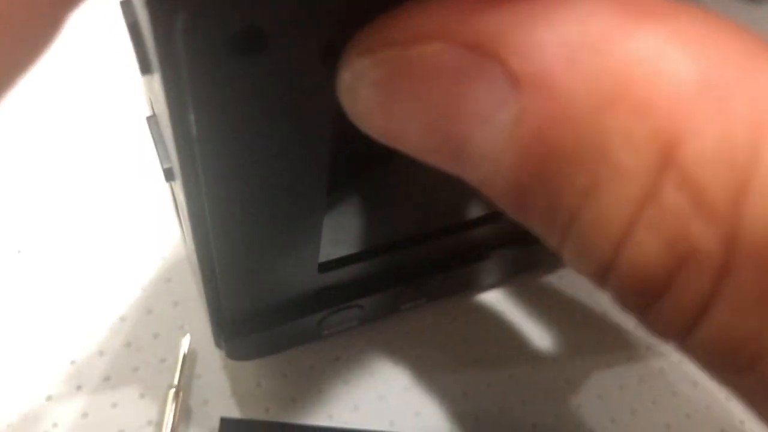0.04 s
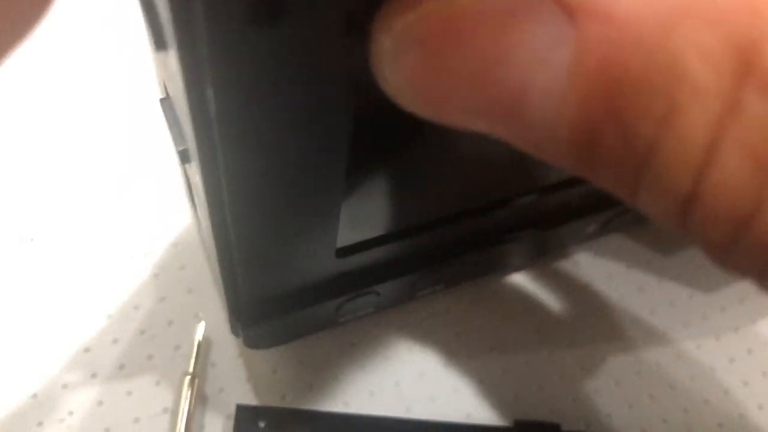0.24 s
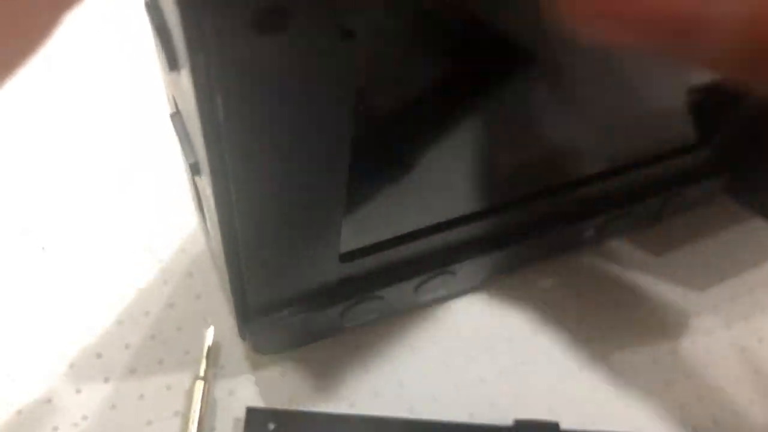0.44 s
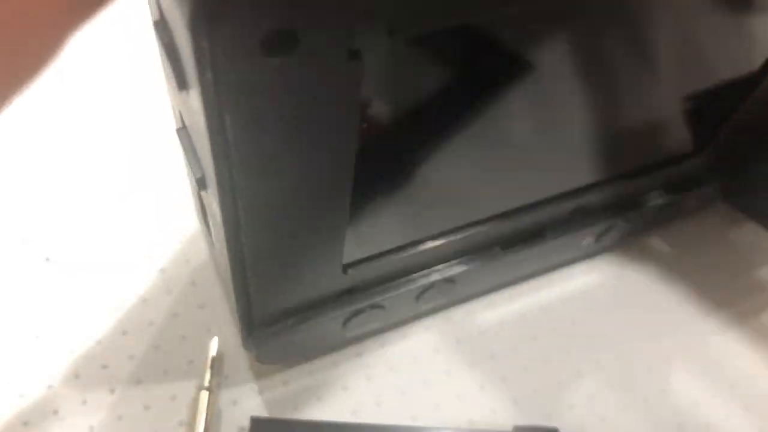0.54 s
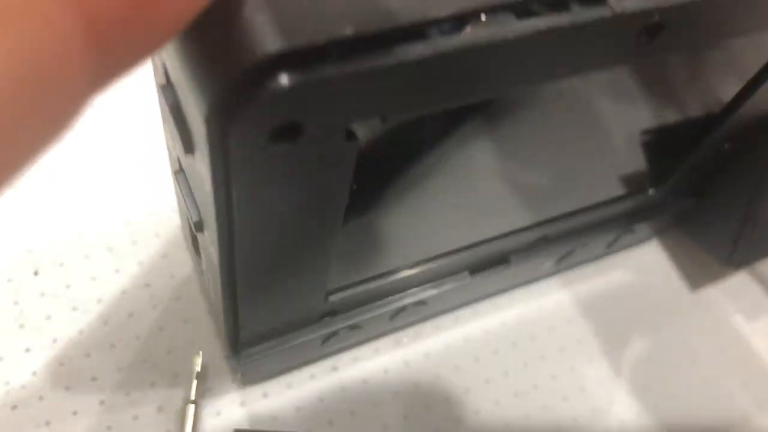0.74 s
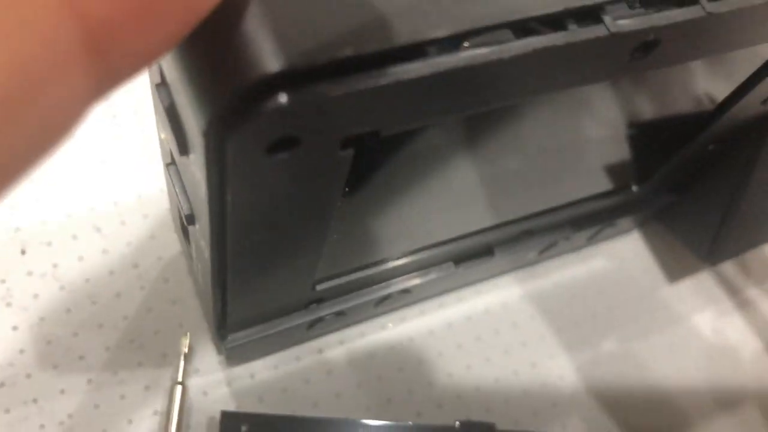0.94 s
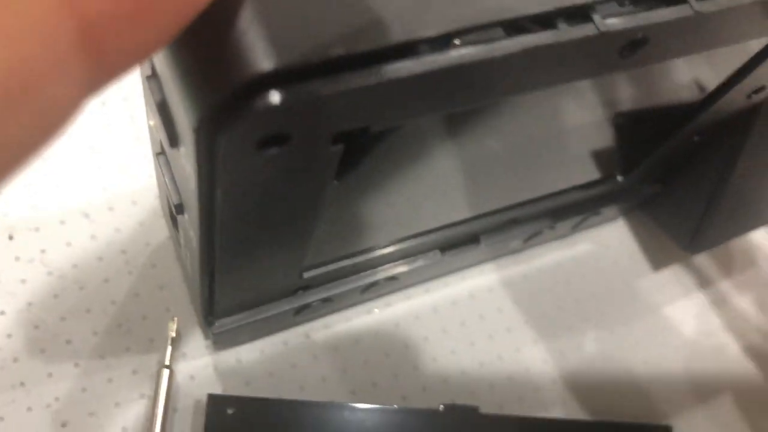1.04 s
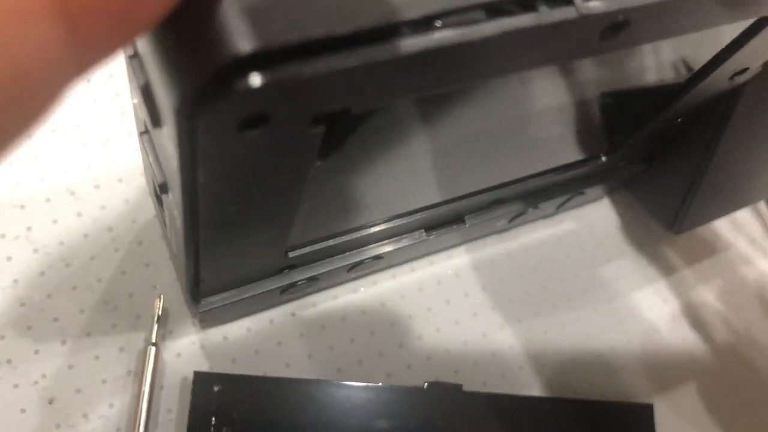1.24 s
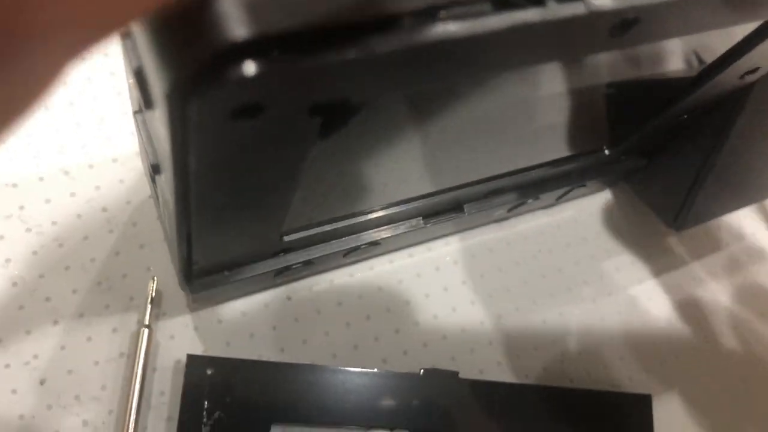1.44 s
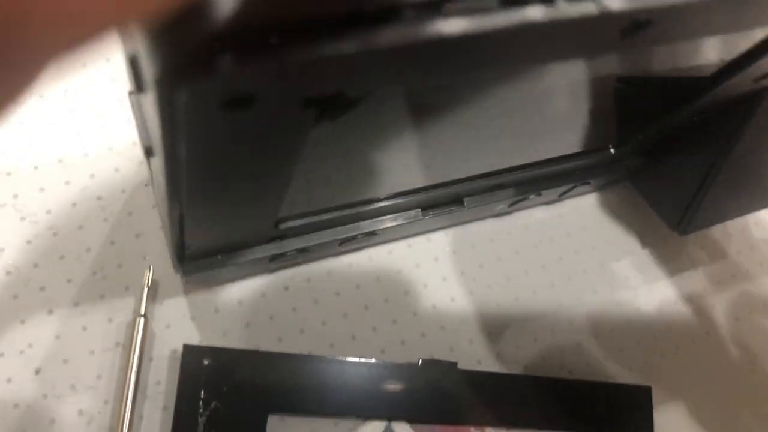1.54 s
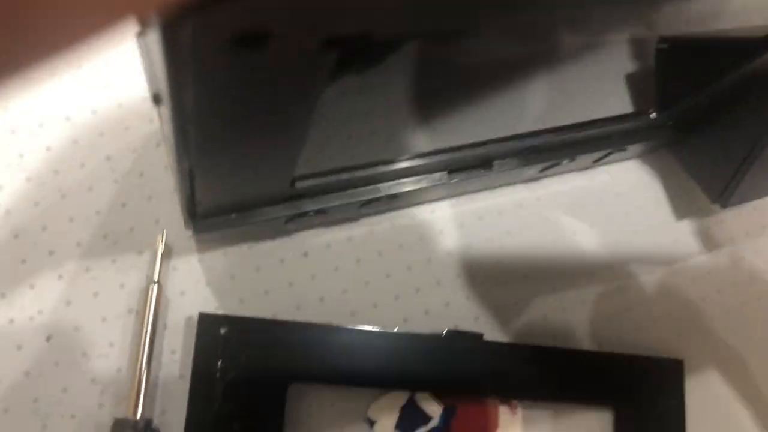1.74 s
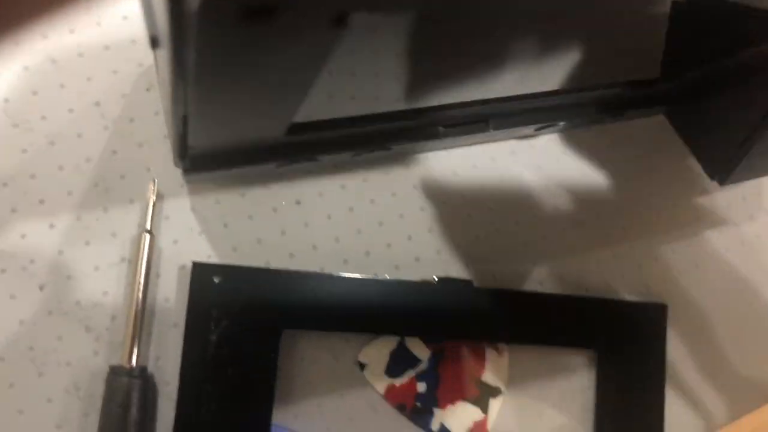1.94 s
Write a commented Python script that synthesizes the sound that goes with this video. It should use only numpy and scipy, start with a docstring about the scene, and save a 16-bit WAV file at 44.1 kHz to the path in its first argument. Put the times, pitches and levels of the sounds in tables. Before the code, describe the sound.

Sharp plastic snaps of a small casing pried by hand, two loud ones in the first half second, then a gritty rub, near quiet, and a softer click with a knock near the end; close microphone, quiet room.

```python
"""Snaps and ticks of a small plastic casing, pried and shifted by hand on a table close to the microphone.
Each snap is a blow and a short chatter of noise that rings the casing's modes. Knocks are dying
low modes of the table top. Fingers and edges slide over it as gritty, shaped noise.
Things on the table scatter the snaps and knocks, a room answers them, and its quiet hum lies behind."""
import sys
import numpy as np
from scipy import signal
from scipy.fft import rfft, irfft, next_fast_len
from scipy.io import wavfile
from scipy.ndimage import uniform_filter1d, map_coordinates

SR = 44100
rng = np.random.default_rng(int(sys.argv[2]) if len(sys.argv) > 2 else 0)


def transcribe(signal):
    """Save signal, clipped to [-1, 1], as a 16-bit WAV file at the path in sys.argv[1]."""
    frames = np.atleast_2d(signal).T
    limited = np.clip(frames, -1, 1)
    pcm = np.round(limited * 32767).astype(np.int16)
    wavfile.write(sys.argv[1], SR, pcm)


def elevation(decibels):
    """Turn decibel levels (scalar or array-like) into linear amplitude ratios."""
    levels = np.asarray(decibels, float)
    return 10 ** (levels / 20)


N = 88200  # samples, two seconds

# Snaps and ticks of the casing. Each row: start in seconds, level in dB of the direct sound,
# strongest frequency in Hz, spread in octaves, contact length in seconds.
CLICK_EVENTS = [(.0937, -62.5, 3860, 1.1, 0.0015), (0.1567, -43.5, 3360, 1.6, 0.00067),
                (0.216, -57.5, 8900, 1.8, 0.00055), (.228, -70, 12000, 0.53, 0.0015),
                (.2355, -65, 4120, 1, 0.0015), (0.2499, -28, 6600, 1.34, 0.001),
                (0.3833, -43, 2200, 1.1, 0.003), (.4325, -36.5, 4140, 1.5, 0.0073),
                (0.4367, -24, 7000, 1.6, 0.00061), (0.4378, -24.5, 4500, 1.8, 0.0021),
                (0.453, -49, 7950, 1.2, .005), (0.767, -54.5, 1200, 0.9, 0.0061),
                (0.9527, -74, 4400, 0.597, 0.0086), (1.2047, -69, 3000, 1.2, 0.0035),
                (1.365, -66, 2320, 0.71, 0.0044), (1.4152, -57.5, 2000, 1.04, 0.0035),
                (1.6628, -44.5, 3400, 0.72, 0.0039), (1.724, -54, 2540, 1.3, .003),
                (1.7395, -34, 6000, 0.63, 0.00066), (1.74, -30, 1670, 0.54, 0.0021),
                (1.746, -48.5, 3480, 0.88, 0.0027), (1.771, -63.5, 6000, 1.2, 0.0024),
                (1.817, -58, 4950, 0.49, .002), (1.981, -52, 3330, 0.63, 0.0023)]
# Resonances of the plastic casing. Each row: centre in Hz, width in Hz, gain in dB.
CASING_MODES = [(650, 590, 2.5), (1186, 320, 7.5), (1680, 210, 2.5), (2186, 220, 9.5), (2680, 200, 4),
                (3198, 130, 6.5), (4871, 350, 3), (5920, 220, 3), (7000, 370, -5), (8340, 330, 4),
                (10280, 490, 0), (11900, 400, 2), (13700, 310, 2), (15960, 400, 0)]
# Knocks on the table top. Each row: start in seconds, level in dB of the direct sound,
# strongest frequency in Hz, spread in octaves.
KNOCK_EVENTS = [(0.102, -52, 70, 0.54), (0.3856, -33, 700, 0.49), (0.44, -33, 520, 0.33),
                (.447, -43, 80, 0.26), (1.366, -65.5, 707, 0.53), (1.671, -58.5, 300, .6),
                (1.4168, -55, 634, 0.28), (1.743, -38, 378, 1.1), (1.755, -51, 110, 0.24),
                (1.831, -64, 293, 1), (1.91, -55, 120, 0.59)]
# Ringing of the table top. Each row: frequency in Hz, time to fall 60 dB in seconds.
TABLE_DECAY = [(60, 0.11), (250, 0.04), (700, .025), (2000, 0.0062)]
# Strokes of fingers and edges. Each row: start, rise, hold and fall in seconds,
# level in dB during the hold, tilt in dB per octave.
SLIDE_STROKES = [(0.017, 0.0033, 0.061, .01, -69.5, -4.5), (0.257, 0.003, .01, 0.078, -61.5, -3),
                 (0.343, .015, 0.012, .01, -57.5, -5), (0.384, 0.021, 0.019, .01, -52.5, -4.5),
                 (0.463, 0.14, 0.067, .1, -49, 1.5), (0.722, .01, .04, 0.0042, -65.5, -3),
                 (.775, 0.0052, 0.024, 0.0088, -68.5, -0.5), (0.893, 0.0045, 0.018, 0.0043, -75.5, 1.5),
                 (1.11, 0.0062, 0.044, 0.057, -68.5, -4), (1.241, .015, 0.026, 0.012, -60, -8),
                 (1.726, 0.0024, .012, 0.0027, -60.5, -11), (1.671, 0.009, 0.027, 0.014, -64.5, -6),
                 (1.754, 0.0088, 0.036, .02, -58.5, -4), (0.957, 0.0035, 0.03, 0.0087, -86, -4),
                 (1.816, 0.012, 0.047, 0.007, -63.5, -6), (1.879, 0.013, 0.011, 0.04, -52, -3),
                 (1.967, 0.0095, .03, .01, -60.5, -4.5)]
# Colour of the rubbing before the tilt. Each row: frequency in Hz, relative spectral level in dB.
RUB_COLOUR = [(180, -48), (300, -25.5), (477, -11.5), (1250, -10), (1450, -15.5), (1550, -5), (2230, -5.5),
              (5120, -2.5), (5650, -1), (15800, -7)]
# Colour of the room's hum. Each row: frequency in Hz, relative spectral level in dB.
HUM_COLOUR = [(12, -54.5), (20, -14), (76, 3), (252, -2.5), (441, -12), (479, -9.5), (1080, -10.5),
              (1170, -15.5), (1590, -11), (3770, -29), (4210, -26), (8940, -33.5), (15600, -37.5)]
# Scatter off the things on the table. Each row: frequency in Hz, time to fall 60 dB in seconds.
NEAR_DECAY = [(500, 0.13), (2200, .05), (10000, 0.018)]
# Dying away of the room. Each row: frequency in Hz, time to fall 60 dB in seconds.
ROOM_DECAY = [(200, 0.14), (2000, 0.48), (5000, 0.36), (12000, 0.19)]
# Colour of the room's answer. Each row: frequency in Hz, gain in dB.
ROOM_TONE = [(200, 5.5), (700, 6), (1150, -5), (2100, 0.5), (3700, -3), (4900, -3), (7000, -4), (15000, -6)]

FIRST_BLOW, BROAD_DB = 2.5, -14  # first blow against chatter of rms 1; crack beside the modes
RELEASE_S, TREBLE_DIES_S = 0.001, 0.006  # time constants of the contact's end and of its dulling
PUSH_LOW_OCT = 1.5  # the table gives off little this far under a knock's strongest frequency
SLIDE_RANGE_DB, SLIDE_RING_DB = 16, -17.5  # depth of rise and fall; share of the casing's modes
GRIT_DB, STREAK_DB = -2.5, 4  # grain of the friction; its drifting streaks
HUM_DB = -63.5  # rms before the microphone
NEAR_DB = -13.5  # scatter off the things on the table
ROOM_DB, ROOM_DELAY_S = -17, 0.012  # room's answer before its colour; its delay
MIC_LOW_HZ, TOP_HZ = 52.3, 16700  # corner of the bass roll-off; upper band limit
DULL_HZ, DULL_DB = 15700, -14  # the top of the treble is shaded


def unit(x):
    """Scales a sound to rms 1."""
    return x / np.sqrt(np.mean(x ** 2) + 1e-20)


def along(points, hz):
    """Reads a table of frequencies and values between its rows, on a log frequency axis."""
    f, v = np.transpose(points)
    return np.interp(np.log(hz + 1), np.log(f + 1), v)


def filtered(x, response):
    """Passes a sound through a complex response of frequency."""
    m = next_fast_len(len(x) + 8192)
    spectrum = rfft(x, m) * response(np.fft.rfftfreq(m, 1 / SR))
    return irfft(spectrum, m)[:len(x)]


def causal(gain):
    """The minimum-phase response with this gain: its energy comes as early as it can."""
    cepstrum = irfft(np.log(np.maximum(gain, 1e-6)))
    half = len(cepstrum) // 2
    cepstrum[1:half] *= 2
    cepstrum[half + 1:] = 0
    return np.exp(rfft(cepstrum))


def bell(f, hz, octaves):
    """Gain that falls off on both sides of the strongest frequency."""
    return np.exp(-0.5 * (np.log2((f + 1) / hz) / max(octaves, 0.2)) ** 2)


def wobble(rate):
    """A smooth random curve with this many knots a second."""
    return map_coordinates(rng.standard_normal(N), [np.arange(N) * rate / SR])


def patchy(db, tall, long):
    """Noise whose gain varies at random in patches, tall bins by long frames."""
    z = signal.stft(rng.standard_normal(N), nperseg=512)[2]
    field = uniform_filter1d(rng.standard_normal(z.shape), size=tall, axis=0)
    field = uniform_filter1d(field, size=long, axis=1)
    return signal.istft(z * elevation(db * unit(field)), nperseg=512)[1][:N]


def dying(t60s, size):
    """Noise in which each frequency dies at its own speed, energy 1."""
    hz, t, z = signal.stft(rng.standard_normal(size), SR, nperseg=128)
    decay = elevation(-60 * t / along(t60s, hz)[:, None])
    tail = signal.istft(z * decay, SR, nperseg=128)[1]
    return tail / np.linalg.norm(tail)


def add(track, s, sound):
    """Places a sound in time with its scatter off the table and, a little later, the room's answer."""
    dry, wet = round(s * SR), round((s + ROOM_DELAY_S) * SR)
    track[dry:dry + len(sound)] += sound
    near = elevation(NEAR_DB) * signal.fftconvolve(sound, dying(NEAR_DECAY, size=4096))
    track[dry:dry + len(near)] += near
    echo = signal.fftconvolve(sound, dying(ROOM_DECAY, size=SR // 2))
    echo = elevation(ROOM_DB) * filtered(echo, lambda f: elevation(along(ROOM_TONE, f)))
    track[wet:wet + len(echo)] += echo


def at_level(ring, db):
    """Gives a short sound the energy of 5 ms at this rms level."""
    return elevation(db) * ring / np.linalg.norm(ring) * np.sqrt(SR / 200)


def casing(f):
    """Response of the casing: a sum of resonances with alternating sign."""
    response = 0
    for k, (centre, width, db) in enumerate(CASING_MODES):
        resonance = 1j * f * width / (centre * centre - f * f + 1j * f * width)
        response = response + (-1) ** k * elevation(db) * resonance
    return response


def clicks():
    """A blow and a brief chatter, duller as it goes, evened out in colour, ring the casing."""
    track, t = np.zeros(N + SR), np.arange(2048) / SR
    bright = np.exp(-t / TREBLE_DIES_S)
    for s, db, hz, octaves, length in CLICK_EVENTS:
        chatter = rng.standard_normal(len(t))
        chatter[0] = FIRST_BLOW
        dull = uniform_filter1d(chatter, size=7, origin=3)
        release = np.exp(-np.maximum(t - length, 0) / RELEASE_S)
        contact = (dull + bright * (chatter - dull)) * release

        def struck(f):
            power = np.abs(rfft(contact, 2 * len(f) - 2)) ** 2
            own_colour = np.sqrt(uniform_filter1d(power, size=60) + 1e-9)
            return (casing(f) + elevation(BROAD_DB)) * causal(bell(f, hz, octaves) / own_colour)

        add(track, s, at_level(filtered(contact, struck), db))
    return track[:N]


def knocks():
    """A soft push sets the dense low modes of the table top ringing, each dying at its own speed."""
    track, t = np.zeros(N + SR), np.arange(8192) / SR
    modes_hz = np.geomspace(50, 2500, 24)[:, None]
    for s, db, hz, octaves in KNOCK_EVENTS:
        # every knock shifts the modes a little and varies their strength by about 1 dB
        f = modes_hz * np.exp(0.054 * rng.standard_normal(modes_hz.shape))
        size = bell(f, hz, octaves) * elevation(rng.standard_normal(f.shape))
        decay = elevation(-60 * t / along(TABLE_DECAY, f))
        ring = np.sum(size * decay * np.sin(2 * np.pi * f * t), axis=0)
        low_hz = hz / 2 ** PUSH_LOW_OCT
        ring = filtered(ring, lambda g: (1j * g / (low_hz + 1j * g)) ** 2)
        add(track, s, at_level(ring, db))
    return track[:N]


def slides():
    """Fine gritty friction under each stroke, partly coloured by the casing's modes."""
    t, out = np.arange(N) / SR, np.zeros(N)
    grit = patchy(STREAK_DB, tall=3, long=5) * elevation(GRIT_DB * wobble(750))
    ringing = lambda f: 1 + elevation(SLIDE_RING_DB) * np.abs(casing(f))
    rub = filtered(grit, lambda f: elevation(along(RUB_COLOUR, f)) * ringing(f))
    for s, rise, hold, fall, db, tilt_db in SLIDE_STROKES:
        edges = np.cumsum([s, rise, hold, fall])
        swell_db = SLIDE_RANGE_DB * np.interp(t, edges, [-1, 0, 0, -1])
        stroke = elevation(db + swell_db) * (t > s) * (t < edges[-1])
        tilted = filtered(rub, lambda f: elevation(tilt_db * np.log2((f + 300) / 4000)))
        out += stroke * unit(tilted)
    return out


def hum():
    """The quiet room behind: coloured noise with a slight patchiness."""
    air = patchy(1, tall=5, long=10)
    return elevation(HUM_DB) * unit(filtered(air, lambda f: elevation(along(HUM_COLOUR, f))))


def scene():
    """All sources at the microphone, one channel."""
    return (clicks() + knocks() + slides() + hum())[None]


def top_cut(x):
    """Nothing passes above the cut-off."""
    return signal.sosfilt(signal.butter(12, 16830, fs=SR, output="sos"), x)


def record(dry):
    """The close microphone: bass roll-off, shaded top treble and an upper band limit."""
    def mic(f):
        bass = (1j * f / (MIC_LOW_HZ + 1j * f)) ** 2
        return bass * (f < TOP_HZ) * elevation(DULL_DB * (f > DULL_HZ))

    mix = filtered(dry[0], mic)[None]
    return top_cut(mix)


dry = scene()
out = record(dry)
transcribe(out)
```